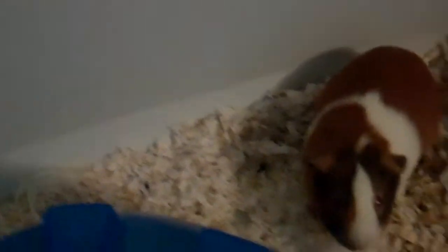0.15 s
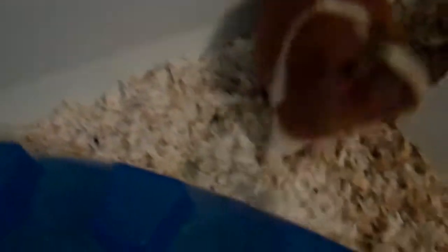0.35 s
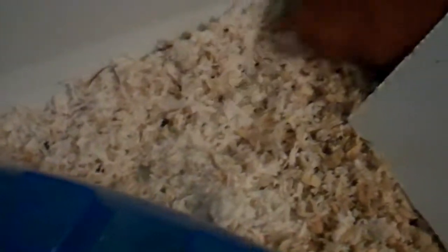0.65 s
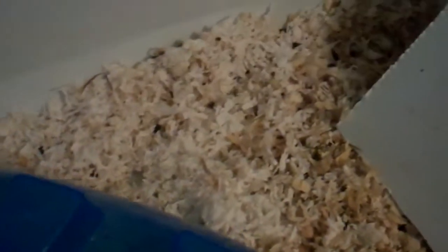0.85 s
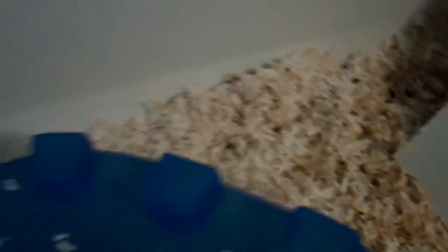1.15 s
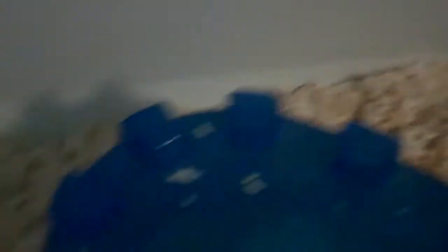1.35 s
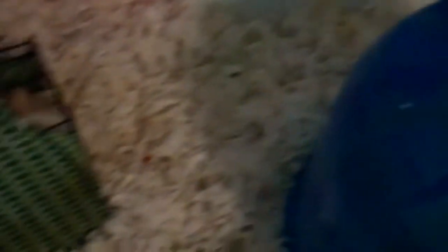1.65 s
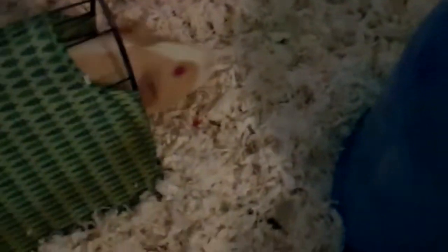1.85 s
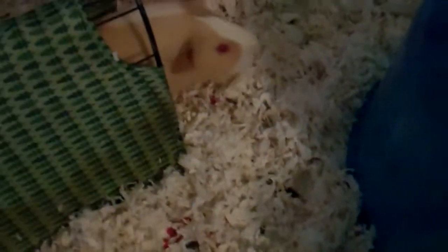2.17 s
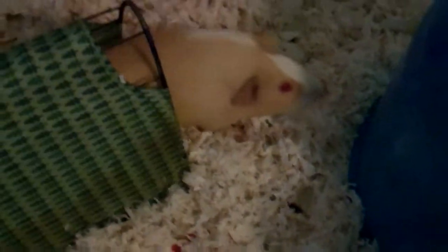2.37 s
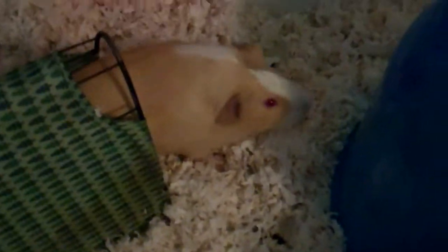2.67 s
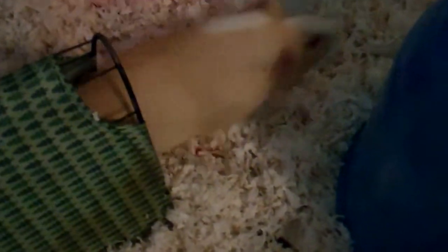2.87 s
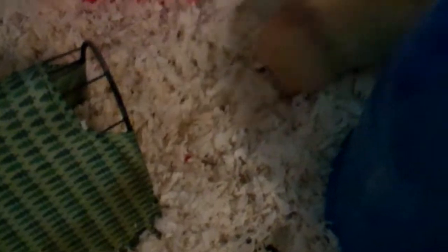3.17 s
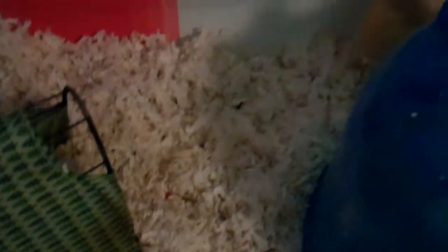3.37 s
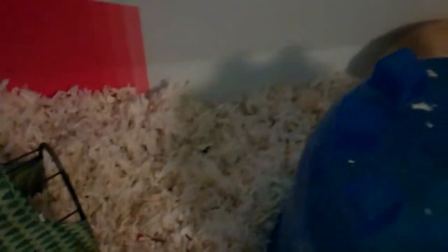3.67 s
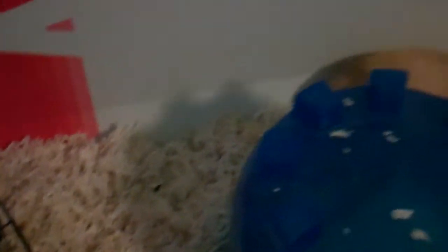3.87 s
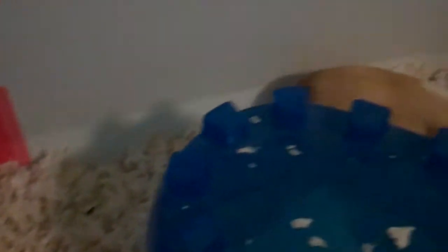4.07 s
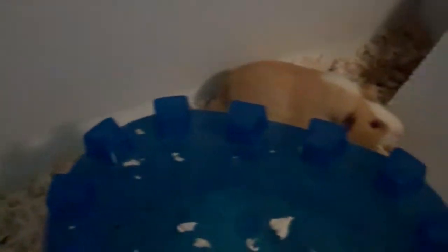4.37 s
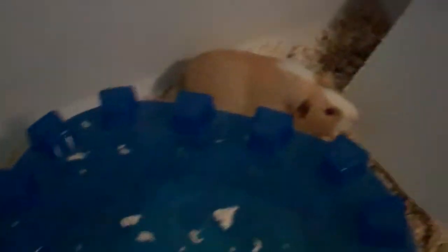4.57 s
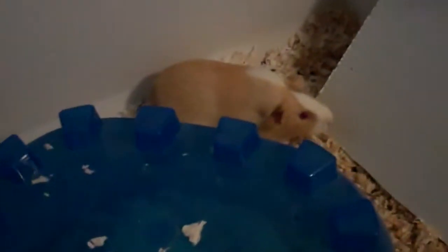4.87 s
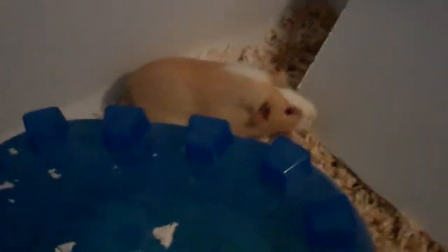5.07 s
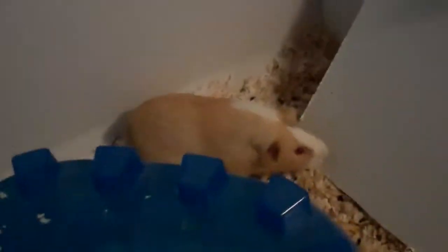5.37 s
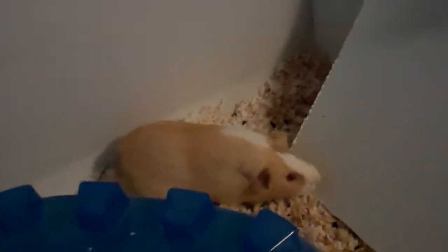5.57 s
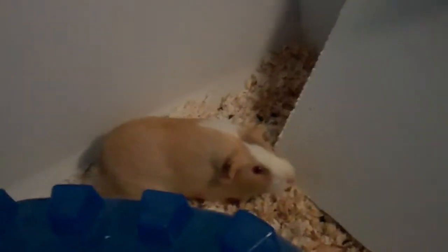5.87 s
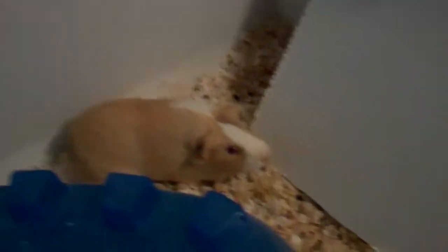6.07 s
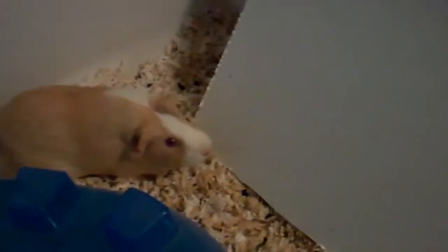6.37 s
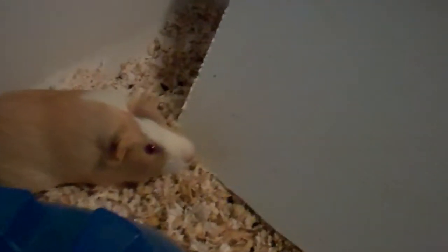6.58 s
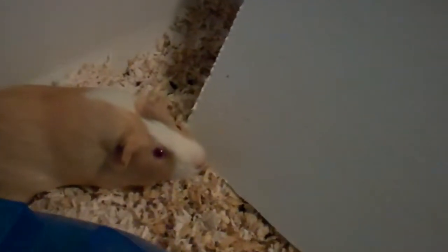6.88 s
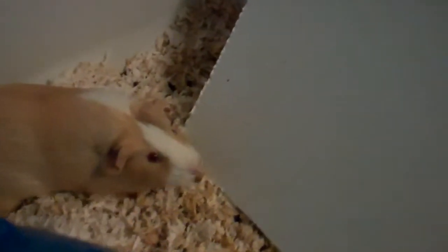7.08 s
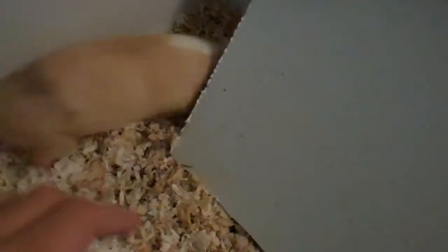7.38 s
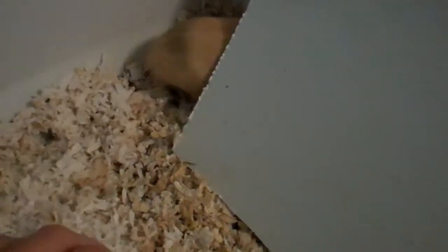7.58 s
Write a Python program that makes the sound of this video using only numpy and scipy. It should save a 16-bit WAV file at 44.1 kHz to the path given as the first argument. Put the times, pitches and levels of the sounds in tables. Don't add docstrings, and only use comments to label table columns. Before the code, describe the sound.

Guinea pigs squeak softly and burst into three piercing upward squeals, with small knocks on plastic, rustling bedding and faint room hiss behind.

```python
import sys
import numpy as np
from scipy import signal
from scipy.fft import rfft, irfft, next_fast_len
from scipy.io import wavfile
from scipy.ndimage import uniform_filter1d, minimum_filter1d, map_coordinates

SR = 44100
rng = np.random.default_rng(int(sys.argv[2]) if len(sys.argv) > 2 else 0)


def amplitude_ratio(level_db):
    exponent = np.asarray(level_db, float) / 20
    return 10 ** exponent


def wav_out(sig):
    wavfile.write(sys.argv[1], SR, np.round(np.clip(np.atleast_2d(sig).T, -1, 1) * 32767).astype(np.int16))


N = 340893
TOP_HZ = 14250

# time in seconds, pitch in Hz, level in dB, mouth tilt in dB per octave.
WHEEKS = [
    [(1.222, 3500, -46.5, -11), (1.26, 3027, -38, -4.5), (1.31, 2684, -18, -0.5), (1.37, 2693, -27.5, -2),
     (1.4, 2866, -24, -6), (1.54, 3073, -13.5, -7.5), (1.61, 3165, -18.5, -3), (1.69, 3273, -20.5, 6.5),
     (1.712, 3530, -27.5, 17)],
    [(1.85, 572.6, -26.5, -6.5), (1.92, 673, -33.5, -7.5), (1.97, 1055, -45, -5), (2.045, 1698, -31.5, 3),
     (2.138, 1827, -23.5, -1.5), (2.3, 2612, -22.5, -5.5), (2.413, 2900, -21.5, -4), (2.468, 3260, -25, 14),
     (2.485, 3250, -58, -8)],
    [(2.565, 629, -42.5, -2), (2.65, 698, -40, -4.5), (2.71, 1066, -45.5, -4), (2.75, 1595, -32, 5),
     (2.842, 2314, -19.5, -1.5), (2.87, 2415, -24.5, -7), (2.986, 2635, -23, -7), (3.001, 3290, -22.5, 4),
     (3.035, 3270, -58, 0)],
]
# time in seconds, pitch ratio, sideband share just after.
FLIPS = [
    (1.6097, 1.145, 0.0088),
    (1.709, 1.2, .01),
    (2.047, 1.08, .01),
    (2.41, 1.107, 0.021),
    (2.844, 1.11, 0.96),
    (2.984, 1.13, 0.033),
]
WHEEK_BREATH = [
    (0.016, 0.016),
    (0.035, 0.0089),
    (.02, 0.033),
]
# centre in Hz, width in Hz, boost in dB, dip in dB.
MOUTH_RING = [
    (5140, 390, 13, 14),
    (6860, 400, 16.5, -1),
    (6310, 940, 12, -8.5),
]
ROUGHNESS = [
    [.9, .12, 0.027, 0.015, 0.0017, 0.0056, 0.0053, 0.014, 0.06],
    [0.14, .03, 0.23, .2, 0.02, 0.015, 0.02, .02, 0.045],
    [.16, .16, .2, 0.07, .02, 0.02, 0.02, .04, .06],
]
# left minus right in dB, left lag in seconds.
FACING = [
    (-7.5,0.000055),
    (-5,0.00011),
    (-5,0.000091),
]
# frequency in Hz, gain in dB.
THROAT = [(400,18.5),(1000,-5),(1700,1.5),(2300,-3),(3000,0.5),(4200,7),(5600,-5),(7500,9),(9500,5),(11500,-7),(13500,9.5),(15000,8)]
# frequency in Hz, density in dB per Hz.
BREATH_COLOUR = [(1500, -12.5), (2300, -9.5), (3500, 8.5), (4300, 5), (5000, -11), (5700, -22), (6500, 7),
                 (8000, 11), (9500, 12), (11500, 1.5), (13500, 7.5)]
# frequency in Hz, gain in dB.
SIDEBAND_COLOUR = [(3000, 5), (4200, -3), (5200, -4), (6300, 4.5), (7300, 1), (8500, -11), (10000, -10),
                   (14000, -4)]

# start in seconds, delay to lowest pitch in seconds, length in seconds,
# lowest pitch in Hz, level in dB.
SQUEAKS = [
    (3.129, 0.015, 0.17, 576, -30.5),
    (3.554, 0.024, 0.14, 554, -30),
    (4.002, 0.031, 0.16, 541.6, -32),
    (5.323, 0.039, 0.14, 554.4, -34),
    (5.578, 0.037, 0.13, 586, -38.5),
    (6.28, 0.02, 0.093, 550, -40),
    (6.497, 0.051, 0.097, 526.4, -38),
    (6.8, 0.0093, 0.15, 566, -41),
    (6.944, 0.0235, 0.045, 1235, -46),
]
HUMS = [
    (4.391, 0.045, 0.11, 519.5, -31.5),
    (4.673, 0.049, 0.11, 518, -37.5),
    (4.973, 0.048, 0.11, 505.6, -34.5),
    (5.846, 0.053, .11, 479.5, -37),
    (7.632, 0.036, 0.091, 530, -35),
]
YELPS = [
    (0.086, 0.051, 0.1, 504.3, -40),
    (0.875, 0.017, 0.12, 570, -32.5),
    (2.777, .044, .105, 618, -39),
]
# second overtone in dB, tilt above it in dB per octave,
# slow rise over the hold in octaves.
VOICING = [(-51.5, 3, .15), (-55, 4, 0.029), (-55, 4, .02), (-55.5, 0.5, 0.145), (-54, -1, -0.057),
           (-53.5, -12, .33), (-48.5, -12.5, .1), (-54, -11, .55), (-54, -12, .05), (-51, -3, 0.074),
           (-58, 0.5, 0.146), (-58.5, -2, 0.123), (-59, -2.5, 0.145), (-56.5, -1, .1), (-46, -2, 0.16),
           (-43.5, -10, 0.117), (-41.5, -2, 0.126)]
CLIMBS_OCT = [.62, .78, 0.97, 0.55, 0.66, 0.34, 0.56, 0.192, .25, 0.93, 1, 0.74, .7, 0.6, 0.497, 0.68,
              0.445]
# start in seconds, length in seconds, first pitch in Hz,
# last pitch in Hz, level in dB.
CHIRPS = [(0.36, 0.052, 396, 360, -37), (0.589, 0.041, 1400, 1140, -45), (1.294, 0.086, 506, 560, -38.5),
          (7.41, 0.037, 584, 540, -38.5), (2.872, 0.063, 3700, 4150, -49), (5.2, 0.029, 3250, 3520, -51),
          (5.197, .05, 2680, 2480, -51), (6.93, .022, 473, 460, -53), (3.3, 0.054, 636, 640, -44),
          (3.303, 0.044, 1304, 1305, -43), (3.432, 0.016, 3150, 3300, -46.5),
          (3.874, 0.027, 3240, 3050, -44.5), (4.246, 0.015, 3100, 3160, -45),
          (4.775, .032, 2100, 2660, -49.5), (5.925, 0.03, 1150, 1830, -49.5),
          (3.34, 0.025, 1900, 2500, -50), (5.245, 0.023, 1046, 990, -37.5),
          (4.52, 0.022, 1650, 1607, -45.5), (5.221, 0.044, 1292, 950, -40.5),
          (5.734, 0.017, 800, 1140, -43.5), (5.772, 0.041, 450, 400, -62),
          (4.506, .021, 2050, 3240, -53),
    (4.531, .017, 3240, 2250, -51),
    (.657, .035, 780, 950, -45),
    (.7, .04, 1090, 1170, -45),
]
MOAN = [
    (2.52, .18, 385, 400, -67),
    (2.77, .13, 390, 420, -60),
    (2.92, .2, 415, 450, -67),
]
BREAKS = [(0.405, 0.06, 513.5, 620, -46), (.656, 0.16, 398, 570, -52.5), (2.316, 0.086, 633, 738, -50),
          (3.269, 0.078, 848, 918, -45.5), (3.39, 0.039, 547, 472, -54.5), (3.686, 0.061, 1028, 1046, -48),
          (3.73, 0.035, 1085, 1246, -49), (3.978, 0.029, 680, 680, -48), (5.191, .055, 647, 706, -48),
          (6.99, 0.056, 1436, 1620, -60), (4.192, 0.049, 516, 769, -48), (5.452, 0.017, 867, 867, -44),
          (5.7, 0.041, 883, 874, -50.5)]
# frequency in Hz, gain in dB.
MOUTH = [(300,-24),(550,0.5),(1200,3),(2000,-4.5),(3000,-5),(3700,-19.5),(5000,-34),(9000,-47)]

# start in seconds, end in seconds, level in dB.
HOARSE = [(0.296,0.367,-46.5),(0.363,0.487,-50.5),(0.513,0.65,-48.5),(0.648,0.746,-55),(0.946,1.208,-55),(1.208,1.463,-58),(1.747,1.837,-51.5),(1.834,1.97,-50.5),(2.045,2.191,-58),(2.306,2.423,-60.5),(2.527,2.636,-58),(3.1,3.156,-52.5),(3.257,3.356,-53),(3.336,3.42,-58.5),(3.496,3.604,-49),(3.722,3.81,-53.5),(3.941,4.04,-52.5),(4.15,4.268,-51.5),(4.317,4.363,-52),(4.398,4.521,-54.5),(4.67,4.728,-52.5),(4.896,4.977,-50.5),(5.024,5.17,-56.5),(5.185,5.264,-49.5),(5.431,5.493,-50),(5.66,5.758,-58),(7.125,7.202,-52.5),(7.253,7.406,-45.5),(7.438,7.491,-45),(3.35,3.455,-69),(3.748,3.881,-64.5),(0.0,0.059,-58.5),(.77,.885,-58),(0.175,0.241,-61)]
HOARSE_UPPER_DB = [-2.5, -1.5, -6.5, -1.5, -4.5, -4.5, -14.5, -2, -1, 2, -1, -8, -15, -2, -9, -11, -8, -4,
                   -4, -2.5, -11, -9.5, -2.5, -3.5, -6, -23, -5.5, -2.5, -1.5, 8.5, 4.5, -4.5, -2.5, -10]
# frequency in Hz, density in dB per Hz.
LOW_RASP = [(150, -36), (250, -1.5), (673, -1), (822, 6), (1150, 2.5), (1500, -15.5), (2100, -33),
            (4000, -120)]
# frequency in Hz, density in dB per Hz.
UPPER_RASP = [(600, -120), (1200, -14.5), (1700, -6.5), (2400, -7.5), (3100, -9.5), (3650, -16),
              (5000, -32), (6500, -48), (11000, -120)]

# time in seconds, peak in dB, bright part in dB, hollow pitch in Hz.
KNOCKS = [(0.021, -41, -46, 740), (0.305, -27, -52, 700), (0.314, -31.5, -60, 2000),
          (0.327, -33, -55, 4430), (0.337, -31.5, -55, 4900), (0.347, -36, -55, 4250),
          (0.379, -27.5, -55, 1690), (0.384, -37, -60, 1550), (0.754, -24.5, -43, 1460),
          (0.76, -26, -27.5, 734), (3.105, -71, -48, 600), (3.478, -40, -85, 780), (3.874, -33, -67, 1800),
          (4.305, -40, -55, 865), (4.329, -34.5, -48, 2160), (4.655, -47, -62, 1120),
          (4.665, -43, -60, 1150), (4.891, -43, -60, 1030), (5.553, -41.5, -46, 710),
          (4.648, -42, -67, 1130), (5.051, -39, -57, 627), (5.176, -32.5, -46, 730), (5.261, -35, -48, 965),
          (5.906, -37.5, -36, 550), (5.998, -31.5, -33.5, 1174), (6.686, -44, -80, 800),
          (7.309, -20.5, -52, 890), (7.431, -31, -58, 550), (7.458, -25.5, -48, 1490),
          (7.545, -38.5, -21.5, 800), (7.567, -45, -50, 790), (7.642, -29, -63, 640)]
# time in seconds, peak in dB.
THUMPS = [(0.18, -48.5), (0.309, -64), (0.514, -48), (0.579, -43), (0.647, -63), (0.756, -43.5),
          (0.951, -45), (1.821, -52), (3.103, -44), (3.275, -47), (3.482, -47), (3.598, -79),
          (7.141, -48.5), (7.299, -52), (7.427, -36.5), (7.469, -84)]
# frequency in Hz, density in dB per Hz.
TRAY = [(41, -41), (70, -3), (130, 7), (298, -6.5), (404, 2), (500, -1.5), (650, 0.5), (1100, -120)]
# start in seconds, end in seconds, level in dB.
SCUFFLES = [(.012,.04,-43),(.28,.37,-36.5),(.37,.48,-42.5),(.51,.62,-38),(.62,.72,-45.5),(.745,.79,-37),(.92,1.02,-45),(1.0,1.22,-53.5),(1.835,1.96,-42),(3.08,3.14,-46),(3.24,3.35,-44),(3.84,3.92,-51.5),(4.29,4.36,-51.5),(4.95,5.05,-48.5),(5.08,5.16,-47.5),(5.15,5.182,-33.5),(5.3,5.6,-55),(7.12,7.2,-46),(7.22,7.43,-33.5),(7.43,7.5,-42),(7.53,7.62,-47)]
# frequency in Hz, density in dB per Hz.
SHAVINGS = [(700,-12),(1500,-8),(3500,-9),(5000,-7),(9000,-10.5),(11500,-7.5),(13500,0),(14600,-33),(15000,-60)]
# time in seconds, peak in dB.
SNAPS = [(0.195, -36), (0.2887, -43), (0.5207, -38), (0.9313, -34), (1.8447, -26), (1.9734, -25),
         (3.257, -27), (3.31, -39), (4.351, -28.5), (4.847, -34), (5.178, -28), (5.4081, -42),
         (5.4989, -30.5), (5.6002, -33), (5.9504, -36), (7.1596, -44), (7.247, -43), (7.4635, -37),
         (7.548, -11.5)]

# frequency in Hz, density in dB per Hz.
ROOM_AIR = [(12, -46), (20, -12.5), (118, -13), (156, -15), (321, -8.5), (369, -15.5), (412, -7.5),
            (591, -14.5), (7810, -17.5), (14000, -17), (15200, -26)]
# frequency in Hz, left-right likeness.
AIR_ALIKE = [(60, 0.64), (240, 0.58), (950, 0.28), (3760, -0.32), (15000, -0.01)]
# frequency in Hz, level in dB, wander in Hz.
APPLIANCES = [
    (120,-67,0.79),
    (386,-74,7.1),
    (7870,-66,15.6),
]
# frequency in Hz, time to fall 60 dB in seconds.
CAGE_DECAY = [(300,0.12),(1500,0.29),(5000,0.16),(12000,0.16)]
# frequency in Hz, left-right likeness.
WALLS_ALIKE = [(300,0.74),(1200,0.51),(3000,0.037),(8000,0.28)]

FLIP_S, SETTLE_S, UNEVEN = 0.0029, 0.065, 0.0055
CURL, CURL_S = 0.0757, 0.0059
CRACK, CRACK_S, CATCH_DB = 0.35, 0.005, 4
SLACK_BREATH, SLACK_HZ = 0.3, 1400
STEP_SHARE, STEP_RATE = 0.025, 60
SHIMMER_DB, SHIMMER_PER_AIR_DB = 2.2, 6
DIP_HZ, DIP_WIDTH_HZ = 4780, 620
SETTLE_OCT_PER_S2, CLIMB_POWER = 220, 2.8
NOSE_OCT, STRAIN_DB = 0.22, -12.5
OPENING_DB_PER_OCT, ONSET_DB, ONSET_S = 3, -6, 0.0083
TILT, CHIRP_OVERTONES_DB, BREAK_OVERTONES_DB, CHIRP_SWELL = -3.5, -17, 1.5, 0.048
STRAIN_JITTER = 0.018
LEAK, SOFT_SHIMMER_DB = 0.4, 3.8
VOICE_WET_DB, FLOOR_WET_DB = -10, -12


def wheeks():
    out, breath = np.zeros((2, N)), noise(BREATH_COLOUR)
    calls = zip(WHEEKS, WHEEK_BREATH, MOUTH_RING, ROUGHNESS, FACING)
    for rows, leak, ring, strain, (pan_db, lag_s) in calls:
        voice, sidebands = wheek(rows, leak, ring, strain, breath)
        call = voice + filtered(sidebands, lambda hz: amplitude_ratio(along(SIDEBAND_COLOUR, hz)))
        out += placed(call, pan_db, lag_s, wet_db=-6.5)
    return out


def wheek(rows, leak, ring, strain, breath):
    s, *cols = np.transpose(rows)
    t = np.arange(s[0], s[-1], 1 / SR)
    hz, db, tilt = (np.interp(t, s, c) for c in cols)
    steady, per_glide = leak
    glide = uniform_filter1d(np.abs(np.gradient(np.log2(hz))) * SR, size=1800)
    air = np.abs(steady + per_glide * glide)
    hz = uniform_filter1d(hz, size=700, mode="nearest")

    voiced, uneven, catch = gate(t), UNEVEN, 0
    for at, ratio, share in FLIPS:
        if not s[0] < at < s[-1]:
            continue
        u = t - at
        hz = hz * np.where(u > 0, ratio, 1 + CURL * np.exp(-np.abs(u) / CURL_S))
        voiced = voiced * np.clip(np.abs(u) / FLIP_S, 0, 1)
        uneven = uneven + share * (u > 0) * np.exp(-np.abs(u) / SETTLE_S)
        if ratio > 1.1:
            catch = catch + np.exp(-((u - CRACK_S) / CRACK_S) ** 2)

    rough = np.interp(t, s, np.abs(strain))
    hz = hz * (1 + STEP_SHARE * np.sqrt(rough) * wobble(STEP_RATE, size=len(t)))
    slack = SLACK_BREATH / 2 * np.clip(1 - hz / SLACK_HZ, 0, 1)
    air = air + rough + 0.067 * uneven + slack
    turn, gain, wave = overtones(hz, np.minimum(tilt, 7), THROAT, jitter=0.0027 + 0.024 * air,
                                 shimmer_db=SHIMMER_DB + SHIMMER_PER_AIR_DB * air)

    partials = np.arange(1, len(gain) + 1)[:, None] * hz
    ring_hz, width_hz, ring_db, dip_db = ring
    boost = ring_db * np.exp(-((partials - ring_hz) / width_hz) ** 2)
    dip = dip_db * np.exp(-((partials - DIP_HZ) / DIP_WIDTH_HZ) ** 2)
    opening = np.clip((hz - 1250) / 650, 0.05, 1)
    gain *= amplitude_ratio(boost + dip) * np.where(partials > 3600, opening, 1)
    gain /= np.sqrt(np.sum(gain ** 2, axis=0))

    upper = np.sum(gain[1:] * wave[1:], axis=0) / np.sqrt(1 + (3 * uneven) ** 2)
    third = np.cos(turn / 3 + 0.88 * wobble(200, size=len(hz)))
    beat = 6.0 * uneven * amplitude_ratio(4.8 * wobble(90.4, size=len(hz))) * third
    air, db = air + CRACK * catch, db + CATCH_DB * catch

    start = round(s[0] * SR)
    voice, sidebands = np.zeros(N), np.zeros(N)
    sound = gain[0] * wave[0] + upper + air * breath[start:start + len(t)]
    add(voice, start, voiced * amplitude_ratio(db + 2.0) * sound)
    add(sidebands, start, voiced * amplitude_ratio(db) * upper * beat)
    return voice, sidebands


def squeaks():
    calls = []
    for (s, *row), (mouth_db, tilt, creep), climb in zip(SQUEAKS + HUMS + YELPS, VOICING, CLIMBS_OCT):
        calls.append((s, tilt, *squeak_shape(*row, mouth_db, creep, climb)))
    for s, *row in CHIRPS + MOAN:
        calls.append((s, TILT, *chirp_shape(*row, CHIRP_OVERTONES_DB + TILT)))
    for s, *row in BREAKS:
        calls.append((s, TILT, *chirp_shape(*row, BREAK_OVERTONES_DB + TILT)))

    out, breath = np.zeros(N), noise(MOUTH)
    for s, tilt, hz, nose, mouth in calls:
        start = round(s * SR)
        jitter = 0.0075 + STRAIN_JITTER * np.log2(hz / hz.min())
        turn, gain, wave = overtones(hz, tilt, MOUTH, jitter, SOFT_SHIMMER_DB)
        leak = LEAK * (1 + np.cos(turn)) * np.roll(breath, -start)[:len(hz)]
        fundamental = gain[0] * wave[0] / amplitude_ratio(along(MOUTH, hz))
        stack = amplitude_ratio(-tilt) * np.sum(gain[1:] * wave[1:], axis=0)
        add(out, start, nose * fundamental + mouth * (stack + leak))
    return out


def squeak_shape(low_s, length, low_hz, db, mouth_db, creep, climb_oct):
    t = np.arange(0, length, 1 / SR)
    held = np.clip((t - low_s) / (length - low_s), 0, 1)
    climb = held ** CLIMB_POWER
    over = np.where(t < low_s, SETTLE_OCT_PER_S2 * (t - low_s) ** 2, creep * held + climb_oct * climb)
    size = gate(t) * amplitude_ratio(ONSET_DB * np.exp(-t / ONSET_S) - 2.5 * climb ** 4)
    nose = size * amplitude_ratio(db + STRAIN_DB * np.tanh(over / NOSE_OCT) ** 2)
    mouth = size * amplitude_ratio(mouth_db + OPENING_DB_PER_OCT * over)
    return low_hz * 2 ** over, nose, mouth


def chirp_shape(length, first_hz, last_hz, db, overtones_db):
    u = np.linspace(0, 1, round(length * SR))
    size = amplitude_ratio(db) * np.sin(np.pi * u).clip(0) ** CHIRP_SWELL
    return first_hz + (last_hz - first_hz) * u, size, size * amplitude_ratio(overtones_db)


def overtones(hz, tilt, tract, jitter, shimmer_db):
    hz = hz * (1 + jitter * wobble(154.6, size=len(hz)))
    turn = 2 * np.pi * np.cumsum(hz) / SR
    k = np.arange(1, 16)[:, None]
    flutter = np.array([wobble(45.76, size=len(hz)) for _ in k])
    shimmer = shimmer_db * flutter * np.minimum(k / 3, 1.3)
    gain = amplitude_ratio(along(tract, k * hz) + tilt * np.log2(k) + shimmer) * (k * hz < TOP_HZ)
    return turn, gain, np.sqrt(2) * np.sin(k * turn + rng.uniform(0, 2 * np.pi, k.shape))


def gate(t, soft_s=0.005):
    return np.clip(np.minimum(t - t[0], t[-1] - t) / soft_s, 0, 1)


def hoarse():
    hz = 640 * (1 + 0.12 * wobble(14) + 0.07 * wobble(200))
    puff = unit(np.exp(3 * np.cos(2 * np.pi * np.cumsum(hz) / SR)))
    tone = 0.35 * amplitude_ratio(2.5 * wobble(30)) * (puff - puff.mean())
    source = (tone + puff * rng.standard_normal(N)) * amplitude_ratio(2.2 * wobble(110))
    low = unit(filtered(source, lambda hz: amplitude_ratio(along(LOW_RASP, hz))))
    upper = unit(filtered(source, lambda hz: amplitude_ratio(along(UPPER_RASP, hz))))
    brighter = [(s, end, db + upper_db) for (s, end, db), upper_db in zip(HOARSE, HOARSE_UPPER_DB)]
    return amplitude_ratio(7.5) * (level(HOARSE, sharpness=0.27) * low + level(brighter, sharpness=0.46) * upper)


def knocks():
    out, t = np.zeros(N), np.arange(SR // 16) / SR
    rise = 1 - np.exp(-t / 0.00032)
    for s, db, bright_db, hz in KNOCKS:
        grit = rng.standard_normal((2, len(t)))
        ring = np.sin(2 * np.pi * hz * t) * amplitude_ratio(-60 * t / 0.015)
        thud = 0.65 * uniform_filter1d(grit[0], size=7) * amplitude_ratio(-60 * t / 0.041)
        snap = np.diff(grit[1], prepend=0) * amplitude_ratio(-60 * t / 0.0093)
        add(out, round(s * SR), rise * (amplitude_ratio(db + 6.0) * (ring + thud) + amplitude_ratio(bright_db + 3.5) * snap))
    return out


def steps():
    gain, t = np.zeros(N), np.arange(SR // 3) / SR
    for s, db in THUMPS:
        add(gain, round(s * SR), amplitude_ratio(db + 1.0 - 60 * t / 0.45) * (1 - np.exp(-t / 0.00082)))
    return gain * noise(TRAY)


def rustle():
    sizes = 1 + 2 * (rng.random(N) < 0.03)
    cracks = rng.standard_normal(N) * sizes * amplitude_ratio(2.5 * wobble(150))
    return level(SCUFFLES, sharpness=0.94) * unit(filtered(cracks, lambda hz: amplitude_ratio(along(SHAVINGS, hz))))


def snaps():
    out, t = np.zeros(N), np.arange(SR // 40) / SR
    for s, db in SNAPS:
        crack = np.diff(rng.standard_normal(len(t)), prepend=0)
        add(out, round(s * SR), amplitude_ratio(db - 60 * t / 0.009) * (1 - np.exp(-t / 0.00046)) * crack)
    return out


def room():
    out = amplitude_ratio(-54) * pair(np.array([noise(ROOM_AIR), noise(ROOM_AIR)]), AIR_ALIKE)
    for hz, db, wander in APPLIANCES:
        turn = 2 * np.pi * np.cumsum(hz + wander * wobble(38)) / SR
        out = out + amplitude_ratio(db + 0.7 * wobble(4.14)) * np.sin(turn)
    return out


def placed(x, pan_db, lag_s, wet_db):
    side = np.array([[1], [-1]]) / 2
    direct = filtered(x, lambda hz: amplitude_ratio(side * pan_db * np.sqrt(hz / 5000))
                      * np.exp(-2j * np.pi * hz * side * lag_s))
    hz, t, z = signal.stft(rng.standard_normal((2, SR // 4)), SR, nperseg=256)
    tail = signal.istft(z * amplitude_ratio(-60 * t / along(CAGE_DECAY, hz)[:, None]), SR, nperseg=256)[1]
    late = np.pad(x, (120, 0))[None]
    echo = signal.fftconvolve(late, tail / np.linalg.norm(tail[0]), axes=1)[:, :N]
    return direct + amplitude_ratio(wet_db) * pair(echo, WALLS_ALIKE)


def pair(x, alike):
    def blend(hz):
        turn = np.arccos(np.clip(along(alike, hz), -1, 1)) / 2
        return np.array([np.cos(turn), np.sin(turn)])
    mid, side = filtered(x, blend)
    return np.array([mid + side, mid - side])


def unit(x):
    return x / np.sqrt(np.mean(x ** 2) + 1e-20)


def along(points, hz):
    f, v = np.transpose(points)
    return np.interp(np.log(hz + 1), np.log(f + 1), v)


def wobble(rate, size=N):
    knots = rng.standard_normal(int(size * rate / SR) + 4)
    return map_coordinates(knots, [np.arange(size) * rate / SR])


def add(track, start, x):
    track[start:start + len(x)] += x[:N - start]


def filtered(x, response):
    m = next_fast_len(N + 8192)
    return irfft(rfft(x, m) * response(np.fft.rfftfreq(m, 1 / SR)), m)[..., :N]


def noise(spectrum):
    return unit(filtered(rng.standard_normal(N), lambda hz: amplitude_ratio(along(spectrum, hz))))


def level(bursts, sharpness):
    gain = np.zeros(N)
    for start, end, db in bursts:
        arch = np.sin(np.linspace(0, np.pi, round((end - start) * SR))).clip(0)
        add(gain, round(start * SR), amplitude_ratio(db) * arch ** sharpness)
    return gain


def scene():
    soft = placed(squeaks(), pan_db=-6.0, lag_s=4e-5, wet_db=VOICE_WET_DB)
    near = placed(hoarse() + knocks() + steps(), pan_db=0.0, lag_s=2e-5, wet_db=FLOOR_WET_DB)
    near = filtered(near, lambda hz: 1 / (1 + (72 / (hz + 1)) ** 8))
    bedding = placed(rustle() + snaps(), pan_db=-1.3, lag_s=3e-5, wet_db=FLOOR_WET_DB)
    return wheeks() + soft + near + bedding + room()


def masked(x, depth_db):
    hz, _, z = signal.stft(x, SR, nperseg=1024)
    high = (hz > 2300)[:, None]
    power = np.mean(np.abs(z) ** 2, axis=0) * high
    band = np.add.reduceat(power, np.arange(0, len(hz), 12)) / 12
    band = np.repeat(band, 12, axis=0)[:len(hz)]
    tone = -minimum_filter1d(-band, size=100, axis=0)
    weak = high & (band < tone * amplitude_ratio(2 * depth_db))
    return signal.istft(z * ~weak, SR, nperseg=1024)[1][:, :N]


def band_limit(x):
    return signal.sosfilt(signal.butter(12, 15560, fs=SR, output="sos"), x)


def record(dry):
    loudness = np.sqrt(np.abs(uniform_filter1d(np.mean(dry ** 2, axis=0), size=2000)))
    ducked = dry / (1 + (loudness / amplitude_ratio(-14)) ** 2) ** 0.78
    mix = masked(ducked, depth_db=-33.5)
    mix = filtered(mix, lambda hz: amplitude_ratio(-62 * np.clip((hz - TOP_HZ) / 250, 0, 1)))
    return band_limit(mix)


dry = scene()
out = record(dry)
wav_out(out)
```